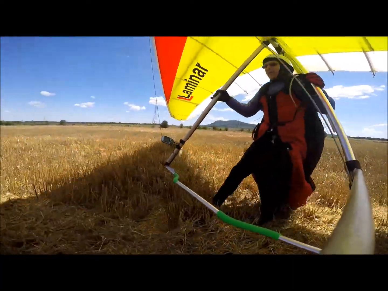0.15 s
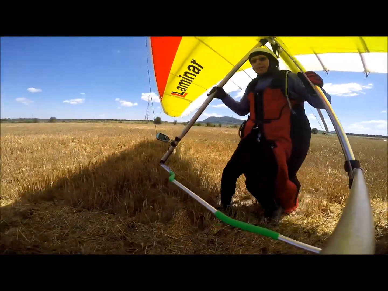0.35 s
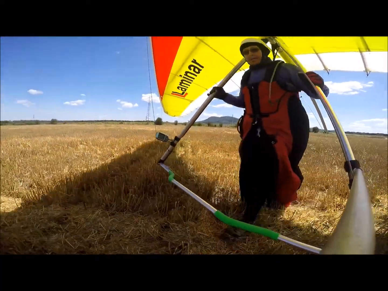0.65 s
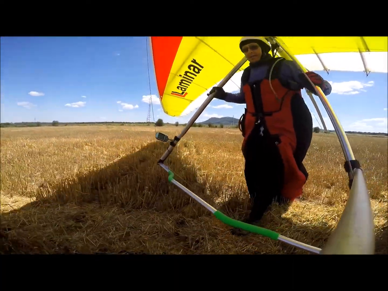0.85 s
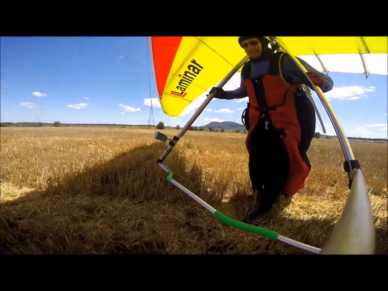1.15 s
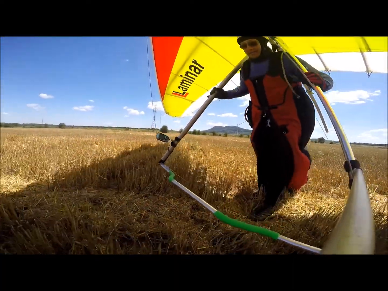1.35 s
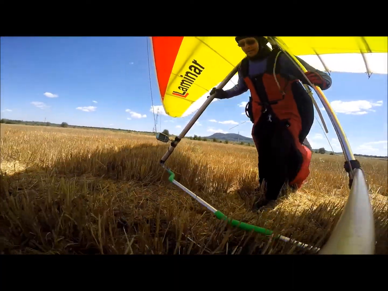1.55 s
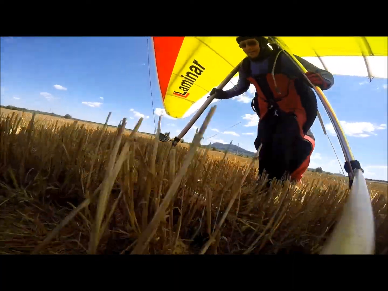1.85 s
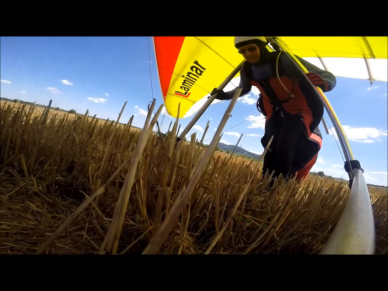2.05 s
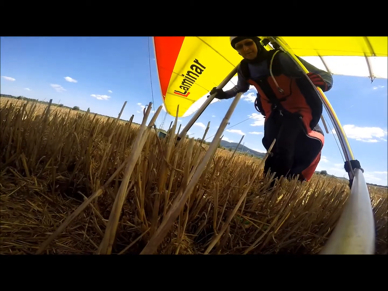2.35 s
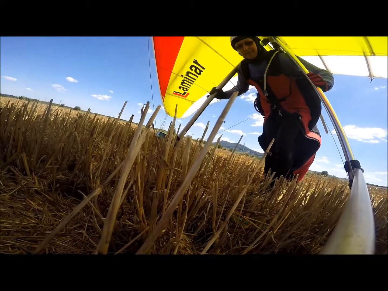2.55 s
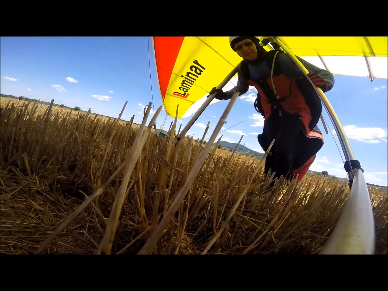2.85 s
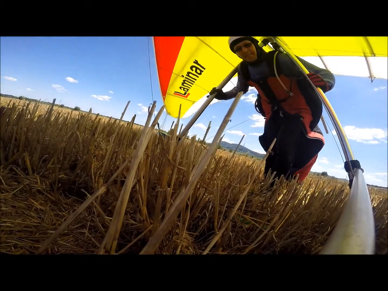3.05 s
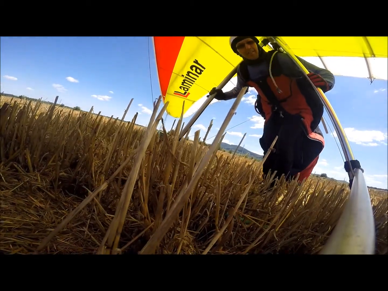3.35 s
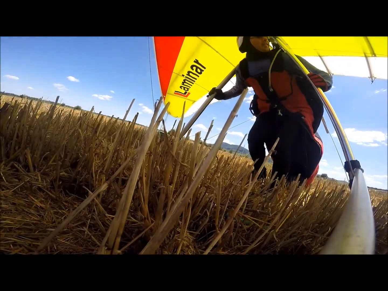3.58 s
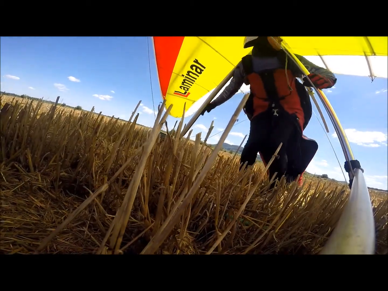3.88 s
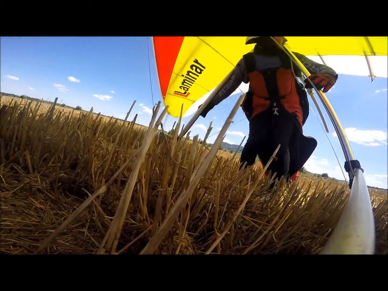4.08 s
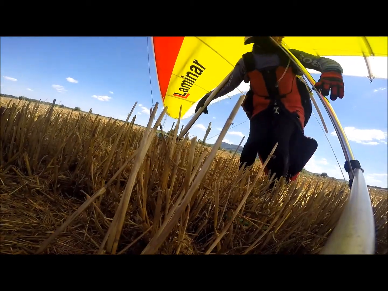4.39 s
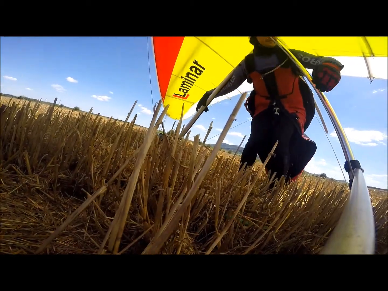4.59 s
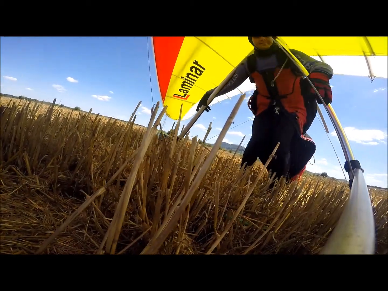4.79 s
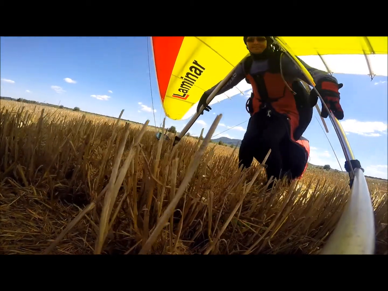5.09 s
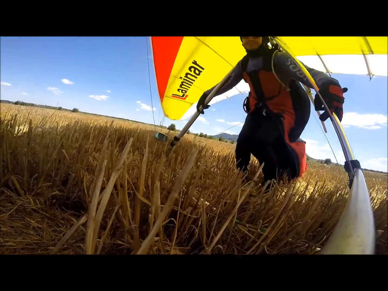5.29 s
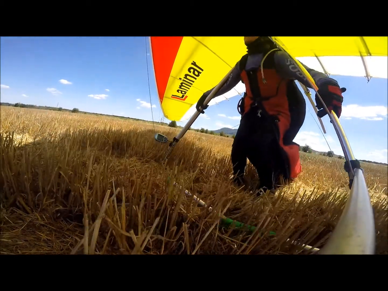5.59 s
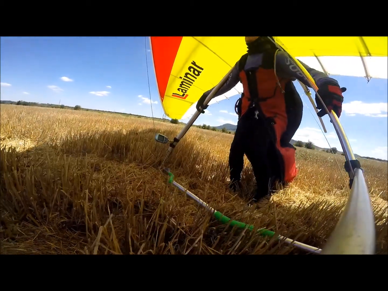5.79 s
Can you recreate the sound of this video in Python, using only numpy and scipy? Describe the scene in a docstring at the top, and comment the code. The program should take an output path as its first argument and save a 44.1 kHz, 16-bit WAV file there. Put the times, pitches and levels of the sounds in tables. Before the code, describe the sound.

Heard from a camera clamped to a glider's tube frame outdoors. Loud knocks and rattles open over a low rumble and straw brushing, then thin out. A heavy boomy thud comes as the frame settles in stubble, followed by quiet scrapes and small ticks. Later come a sharp knock, two deep jolts, a small squeak and a rasping creak.

```python
"""The tube frame of a hang glider, carried and set down in stubble, sways in two low bending modes and takes heavy jolts.
Narrow noise makes the sway, and short decaying sines the jolts. Fittings knock, the sharper knocks with a bright
airborne crack, as bursts of noise through resonances; decaying sines add ringing notes of struck metal and short
sliding squeaks. Straw brushes the tubes as many small scrapes, and a clamp creaks in stick-slip jerks.
The electronics of a camera clamped to the frame in a hard housing add a faint whine and noise."""
import sys
import numpy as np
from scipy import signal
from scipy.fft import rfft, irfft, next_fast_len
from scipy.io import wavfile
from scipy.ndimage import uniform_filter1d

SR = 44100
rng = np.random.default_rng(int(sys.argv[2]) if len(sys.argv) > 2 else 0)


def wav_out(sig):
    """Save sig, one row per channel (or a flat mono array), as 16-bit PCM at SR to the path in sys.argv[1]."""
    wavfile.write(sys.argv[1], SR, np.round(np.clip(np.atleast_2d(sig).T, -1, 1) * 32767).astype(np.int16))


def rack_gain(trim_db):
    """Turn a fader trim in dB into the linear factor to multiply a signal by."""
    fader = np.asarray(trim_db, float)
    return 10 ** (fader / 20)


N = 261513  # length in samples


def unit(x):
    """Normalisation: x at rms 1."""
    return x / np.sqrt(np.mean(x ** 2) + 1e-20)


def curves(rows):
    """Linear interpolation: one value per sample for each column after the time."""
    seconds, *columns = np.transpose(rows)
    t = np.arange(N) / SR
    return [np.interp(t, seconds, column) for column in columns]


def filtered(x, response):
    """Linear filtering: the spectrum of x is multiplied by a complex response of frequency."""
    size = next_fast_len(N + 8192)  # room for the tail
    hz = np.fft.rfftfreq(size, 1 / SR)
    return irfft(rfft(x, size) * response(hz), size)[:N]


def noise(spectrum):
    """Spectral shaping: white noise coloured by (Hz, dB) points, then set to rms 1."""
    point_hz, point_db = np.transpose(spectrum)

    def colour(hz):
        return rack_gain(np.interp(np.log(hz + 1), np.log(point_hz + 1), point_db))

    return unit(filtered(rng.standard_normal(N), colour))


def rings(x, modes, top_hz):
    """Modal resonance: x drives a sum of damped modes, dulled above top_hz and scaled to keep white noise level."""
    def response(f):
        total = 0
        for k, (centre, width, db) in enumerate(modes):
            sign = (-1) ** k  # successive modes alternate in sign
            total = total + sign * rack_gain(db) * 1j * f * width / (centre ** 2 - f * f + 1j * f * width)
        dulling = (top_hz ** 2 / (top_hz ** 2 - f * f + 1.2j * f * top_hz)) ** 2
        return total * dulling

    return filtered(x, lambda f: response(f) / np.sqrt(np.mean(np.abs(response(f)) ** 2)))


# Spectrum of the electronic noise. Each row: frequency in Hz, relative level in dB per Hz.
SELF_NOISE_SPECTRUM = [(150, -70), (400, 15), (1500, -16.5), (3300, -8.5), (4000, -20), (5200, -9),
                       (8000, -20), (15500, -25.5)]


def electronics():
    """Phase reversal: a faint whine flips its sign at a steady rate, over its steady overtone and a bed of noise."""
    whine_hz, whine_peak_db, overtone_peak_db, noise_rms_db = 6309, -62.5, -73.5, -62.0
    turns_per_s = 31
    t = np.arange(N) / SR
    turning = np.tanh(6 * np.sin(np.pi * turns_per_s * (t - .017)))
    whine = rack_gain(whine_peak_db) * turning * np.sin(2 * np.pi * whine_hz * t)
    overtone = rack_gain(overtone_peak_db) * np.sin(4 * np.pi * whine_hz * t)
    return whine + overtone + rack_gain(noise_rms_db) * noise(SELF_NOISE_SPECTRUM)


# Strokes of the slipping clamp, a false start and then the long creak.
# Each row of a stroke: time in seconds, slips per second, drive in dB.
CREAK_STROKES = [
    [(5.287, 68, -24), (5.305, 77, -26.5)],
    [(5.335, 34, -18.5), (5.36, 85, -22), (5.415, 101.5, -20), (5.445, 86, -17), (5.475, 64, -15),
     (5.5, 125, -21.5), (5.52, 62, -18), (5.545, 46, -24)],
]
# Modes that the slipping clamp rings. Each row: frequency in Hz, width in Hz, relative level in dB.
CLAMP_MODES = [(217, 50, -2.5), (457, 46, 4), (932, 71, 10), (1406, 170, -8.5), (1680, 58, 0.5),
               (2205, 360, -13), (2450, 67, -4.5), (3065, 64, -18.5), (3430, 72, -21), (3880, 73, -22)]


def creak():
    """Stick-slip friction: each jerk is a sharp release, much like the last, then a short rub; the clamp dulls the treble."""
    jerk = 14  # size of the release over the rubbing noise
    clamp_top_hz, rub_t60_s = 4200, .045
    scatter_s, scatter_db = .0005, 1  # chance variation in the time and drive of a slip
    drive = np.zeros(N + SR)
    t = np.arange(SR // 10) / SR
    for stroke in CREAK_STROKES:
        slips_per_s, level_db = curves(stroke)
        span = np.arange(round(stroke[0][0] * SR), round(stroke[-1][0] * SR))
        slips_done = np.cumsum(slips_per_s[span]) / SR
        # one slip each time the running count reaches a whole number
        for i in span[np.searchsorted(slips_done, np.arange(np.ceil(slips_done[-1])))]:
            late, size = rng.standard_normal(2)
            burst = rack_gain(-60 * t / rub_t60_s) * rng.standard_normal(len(t))
            burst[0] = jerk
            start = i + round(scatter_s * late * SR)
            drive[start:start + len(t)] += rack_gain(level_db[i] + scatter_db * size) * burst

    def dulling(f):
        return 1 / (1 + 1j * f / clamp_top_hz - (f / clamp_top_hz) ** 2) ** 2

    return rings(filtered(drive[:N], dulling), CLAMP_MODES, clamp_top_hz)


def scratch(rate, spread_db, bed):
    """Shot noise: short scrapes of random size, rate per second on average, over a bed of smooth rubbing."""
    happens = rng.random(N) < rate / SR
    starts = happens * rack_gain(spread_db * rng.exponential(size=N))
    decay = rack_gain(-60 * np.arange(2000) / SR / 0.066)  # t60 of 0.066 s
    envelope = signal.fftconvolve(starts, decay)[:N]
    return unit((bed + unit(envelope)) * rng.standard_normal(N))


# Straw and cloth brushing the frame.
# Each row: time in seconds, body level in dB, edge level in dB, airborne hiss level in dB.
BRUSH_LEVELS = [(0.0, -32, -50, -48), (0.26, -37, -50, -51), (0.4, -47, -46, -58.5),
                (0.62, -38.5, -56, -52), (0.95, -47.5, -56, -59.5), (1.45, -37.5, -52, -63.5),
                (1.6, -35, -45.5, -55), (1.76, -34, -41.5, -52), (1.9, -33.5, -43, -47.5),
                (2.0, -40, -45.5, -56.5), (2.3, -40.5, -45.5, -59), (2.45, -46, -52.5, -63.5),
                (2.66, -46, -53.5, -65), (2.88, -53, -74, -72.5), (3.13, -52, -61, -67),
                (3.28, -40.5, -44, -72), (3.43, -43.5, -41, -61.5), (3.65, -38, -43.5, -55),
                (3.79, -34.5, -44, -59.5), (3.87, -46, -49, -65), (4.4, -42.5, -52, -64),
                (4.54, -44.5, -53, -67), (4.72, -45, -48, -66.5), (5.15, -36, -47.5, -63),
                (5.28, -49, -52, -63), (5.6, -38.5, -45, -57), (5.816, -36.5, -47, -62.5),
                (5.93, -46, -57, -62)]
# Low, tube and edge modes of the housing and tubes, driven by brushing and by knocks.
# Each row: frequency in Hz, width in Hz, relative level in dB.
BODY_MODES = [(222, 168, -4.5), (372, 49, -0.5), (456.6, 81, 5), (668.3, 62.4, 1.5)]
TUBE_MODES = [(864.5, 139, 3), (1086.5, 80, 2.5), (1262, 43, -7.5)]
EDGE_MODES = [(1728, 88, 17.5), (1980, 29, -20), (2520, 275, 7), (2612, 94, 11.5), (2640, 210, -9.5)]
# Spectrum of the airborne hiss. Each row: frequency in Hz, relative level in dB per Hz.
HISS_SPECTRUM = [(2000, -74.5), (3100, -20), (3500, 11.5), (4200, 10), (5200, 1.5), (7300, 2.5), (9500, -2),
                 (12000, -2.5), (15500, -7.5)]


def brushing():
    """Friction noise: dry stalks rub the tubes, exciting body, tube and edge modes, and a thin hiss comes by air."""
    body_db, edge_db, hiss_db = curves(BRUSH_LEVELS)
    low = unit(rings(scratch(110, 5.1, bed=1.02), BODY_MODES, top_hz=1470))
    tube = unit(rings(scratch(100, 3.2, bed=0.36), TUBE_MODES, top_hz=2500))
    body = unit(low + 0.91 * tube)
    edge = unit(rings(scratch(90, 2.03, bed=0.95), EDGE_MODES, top_hz=3300))
    crackle = uniform_filter1d(np.abs(scratch(120, 2.2, bed=1.4)), size=40)
    hiss = unit(crackle * noise(HISS_SPECTRUM))
    return rack_gain(body_db) * body + rack_gain(edge_db) * edge + rack_gain(hiss_db) * hiss


# Highest modes of the housing, modes shaping the airborne sound, and broad, quickly damped modes of the mount.
# Each row: frequency in Hz, width in Hz, relative level in dB.
TOP_MODES = [(3000, 67, -0.5), (3470, 92, 11), (3700, 160, -10), (3970, 560, 10)]
AIR_MODES = [(4800, 67, 3), (5390, 60, 5), (6100, 200, 5.5), (7440, 550, -2), (12200, 5000, -12)]
MOUNT_MODES = [(1367, 870, 7.5), (2404, 1440, 7.5), (2960, 340, 6.5)]


def struck(contacts, push, top_db):
    """Impact excitation: a sharp push and a dying burst of noise drive each group of modes by its own strength."""
    mount_db = 4  # drive of the mount against the edge modes
    chatter_per_s, chatter_db = 300, 5  # a contact chatters: its burst is lumpy
    drive = np.zeros((6, N + SR))
    t = np.arange(SR // 5) / SR
    # decay speed of body, tube, edge, top, air and mount: the treble mostly dies sooner
    speed = np.array([[.9], [1.1], [1.1], [1.5], [2.5], [1.3]])
    rise = 1 - np.exp(-t / .0003)
    chatter_rise = 1 - np.exp(-t * chatter_per_s)
    for s, body_db, tube_db, edge_db, air_db, t60 in contacts:
        burst = rack_gain(-60 * speed * t / max(t60, .004)) * rise * rng.standard_normal(len(t))
        lumps = np.interp(t * chatter_per_s, np.arange(64), rng.standard_normal(64))
        burst *= rack_gain(chatter_db * lumps * chatter_rise)
        burst[:, 0] = push
        # the highest housing modes follow both the hard edge and the airborne crack
        top = rack_gain(edge_db + top_db) + rack_gain(air_db)
        gains = np.array([rack_gain(body_db), rack_gain(tube_db), rack_gain(edge_db), top, rack_gain(air_db), rack_gain(edge_db + mount_db)])
        start = round(s * SR)
        drive[:, start:start + len(t)] += gains[:, None] * burst
    groups = [(BODY_MODES, 1500), (TUBE_MODES, 2200), (EDGE_MODES, 3400),
              (TOP_MODES, 4100), (AIR_MODES, 18000), (MOUNT_MODES, 3300)]  # (modes, treble limit Hz)
    return sum(rings(d[:N], modes, top_hz) for d, (modes, top_hz) in zip(drive, groups))


# Knocks of fittings on the tubes; hardness tips the blow from the low modes to the high ones.
# Each row: start in seconds, strength in dB, hardness in dB, nominal t60 in seconds.
KNOCK_BLOWS = [(0.016, -13, 1.5, 0.018), (0.068, -23, 0, 0.01), (0.124, -28, -6, 0.052),
               (0.148, -25.5, 0.5, 0.041), (.168, -33, -4.5, 0.03), (0.204, -23.5, -0.5, 0.01),
               (0.226, -8, 5.5, 0.036), (0.281, -35, -8.5, 0.12), (.324, -22, -2, 0.093),
               (0.444, -27.5, -10, 0.047), (0.559, -43, -13, 0.13), (0.643, -19, -6, 0.06),
               (.779, -25, -1.5, 0.087), (0.822, -28, -7, .047), (0.884, -37.5, -5.5, .07),
               (.972, -28, -7, 0.046), (1.108, -42, 17, 0.031), (1.164, -44.5, 14.5, 0.037),
               (1.218, -40.5, 2.5, 0.023), (1.419, -42, 20.5, 0.028), (1.464, -22, -5, 0.1),
               (1.479, -27, 2, 0.05), (1.505, -26, -10.5, 0.057), (1.562, -35.5, -5.5, 0.054),
               (1.611, -33, -6, 0.057), (1.784, -21.5, -7.5, 0.031), (1.826, -13, -7.5, 0.07),
               (1.863, -21.5, -3.5, 0.076), (1.909, -35.5, -6, 0.12), (2.181, -31.5, -7, 0.022),
               (2.218, -40, 8.5, 0.11), (2.293, -42, 4, 0.15), (2.572, -45, 7, 0.04),
               (2.827, -38.5, 17, 0.053), (2.882, -46.5, -5, 0.11), (2.981, -47.5, -2, 0.13),
               (3.062, -32, 1.5, 0.033), (3.076, -31, 2.5, 0.045), (3.094, -38.5, 7, 0.052),
               (3.132, -35.5, -10.5, 0.015), (3.212, -40, -10.5, 0.03), (3.281, -40, 4, 0.1),
               (3.53, -34.5, -1.5, 0.052), (3.622, -44, 4, 0.033), (3.694, -18.5, 0.5, 0.03),
               (3.792, -36, -3.5, 0.18), (4.485, -23, -4.5, 0.046), (4.541, -42, -6, 0.24),
               (5.034, -28, -3, 0.017), (5.22, -32, -4.5, 0.058), (5.234, -39, 9, 0.034),
               (5.269, -32, -8, 0.028), (5.588, -33.5, -5.5, 0.017), (5.662, -37, 4, 0.045),
               (5.748, -29, -3, 0.11), (5.799, -35, -8, 0.2)]
# Bright, airborne crack of the sharper knocks.
# Each row: start in seconds, strength in dB, nominal t60 in seconds.
KNOCK_CRACKS = [(.014, -25, 0.021), (.149, -42.5, 0.056), (0.229, -17, 0.023), (.557, -46, 0.014),
                (1.466, -42.5, 0.35), (1.506, -40, 0.058), (1.611, -38.5, 0.043), (1.861, -46.5, 0.13),
                (1.91, -46, 0.047), (1.956, -41.5, 0.056), (2.182, -31.5, 0.012), (2.292, -41.5, 0.034),
                (3.283, -39.5, 0.056), (3.486, -48, 0.085), (3.695, -37.5, 0.092), (3.729, -44, 0.33),
                (5.233, -44.5, 0.082), (5.394, -44.5, 0.027)]
# Ringing notes of struck metal, and short sliding squeaks.
# Each row: start in seconds, starting pitch in Hz, slide in Hz per second, starting level in dB, t60 in seconds.
NOTES_AND_SQUEAKS = [(.014, 2560, 0, -12, .04), (.228, 2132, 0, -18, .15), (.228, 4231, 0, -36, .13),
                     (.322, 1200, -24000, -13, .12), (1.42, 2560, 0, -27, .04), (1.479, 2560, 0, -24, .04),
                     (2.828, 2589, 0, -17, .035), (2.829, 4910, 0, -36, .02), (2.829, 5582, 0, -44, .05),
                     (3.284, 5582, 0, -62, .6), (3.696, 1028, 0, -14, .14), (3.696, 3025, 0, -38, .2),
                     (4.886, 2100, 9000, -22, .06), (4.892, 2350, 16000, -24, .035),
                     (5.838, 1050, 2000, -28, .06), (4.9, 2132, 0, -42, .2), (5.86, 4240, 0, -64, .8),
                     (4.73, 4240, 0, -62, 1.5)]


def knocks():
    """Impact and damped oscillation: fittings knock, the sharper with a bright crack; metal notes ring, squeaks slide."""
    edge_offset_db = -3  # a knock drives the edge modes less than the tube
    air_offset_db = -45  # what a knock sends through the air, under its edge modes
    contacts = []
    for s, db, hard_db, t60 in KNOCK_BLOWS:
        edge_db = db + hard_db + edge_offset_db
        contacts.append((s, db - hard_db, db, edge_db, edge_db + air_offset_db, t60))
    for s, db, t60 in KNOCK_CRACKS:
        contacts.append((s, -np.inf, -np.inf, -np.inf, db, t60))
    out = struck(contacts, push=3.1, top_db=-24)
    t = np.arange(N) / SR
    for s, hz, slide, db, t60 in NOTES_AND_SQUEAKS:
        since = np.clip(t - s, 0, 3 * t60)
        rise_s = .003 if slide else .0002  # a struck note starts at once, a squeak swells
        envelope = rack_gain(db - 60 * since / t60) * (1 - np.exp(-since / rise_s))
        out += envelope * np.sin(2 * np.pi * (hz + slide * since / 2) * since)
    return out


def evened(x, span_s, share):
    """Steady drive of a damped mode: part of the chance swell of narrow noise is levelled."""
    power = np.abs(uniform_filter1d(x ** 2, max(int(span_s * SR), 1)))
    return unit(x / (power + 0.016) ** (np.clip(share, 0, 1) / 2))


# Sway of the frame. Each row: time in seconds, slow mode level in dB, fast mode level in dB.
SWAY_LEVELS = [(0.0, -21.5, -13.5), (1.01, -15.5, -23), (1.04, -28, -17), (1.34, -19.5, -18),
               (1.4, -34, -16), (1.5, -17.5, -12.5), (1.72, -24, -33.5), (1.86, -7, -3.5),
               (1.91, -23.5, -29.5), (2.25, -22, -19.5), (2.29, -29, -27), (3.43, -30, -33.5),
               (4.26, -30.5, -21), (4.33, -23.5, -32.5), (4.59, -28, -25), (4.72, -27, -31),
               (4.77, -13, -19), (5.02, -29.5, -24.5), (5.15, -8, -14.5), (5.24, -24, -20),
               (5.81, -26, -29.5), (5.93, -33, -21.5)]
# Spectra of the two bending modes. Each row: frequency in Hz, relative level in dB per Hz.
SLOW_MODE_SPECTRUM = [(8, -16), (15, -22), (22, -3), (30, -9), (41, 3), (47, 1.5), (53, -10.5), (60, -17),
                      (70, -24), (120, -120)]
FAST_MODE_SPECTRUM = [(40, -47), (60, -15), (70, 2), (77, -4.5), (84, -6.5), (95, -22.5), (128, -26),
                      (145, -35), (200, -45.5), (320, -46), (500, -120)]
# Heavy jolts through the frame.
# Each row: start in seconds, level in dB before the rise and decay, pitch in Hz, t60 in seconds.
FRAME_JOLTS = [(1.826, -9.5, 72.3, 0.3), (4.743, 2, 35.2, 0.14), (5.13, 1.5, 40.4, 0.25)]


def frame():
    """Forced and free bending vibration: wind and steps sway two modes; jolts set off a short heavy swing."""
    slow_db, fast_db = curves(SWAY_LEVELS)
    slow = evened(noise(SLOW_MODE_SPECTRUM), 0.16, 1.0)
    fast = evened(noise(FAST_MODE_SPECTRUM), 0.053, 0.45)
    out = rack_gain(slow_db) * slow + rack_gain(fast_db) * fast
    t = np.arange(N) / SR
    for s, db, hz, t60 in FRAME_JOLTS:
        since = np.clip(t - s, 0, None)
        rise = 1 - np.exp(-(since / 0.019) ** 2)
        out += rack_gain(db - 60 * since / t60) * rise * np.sin(2 * np.pi * hz * since)
    return out


def scene():
    """Superposition: all sources add at the one microphone."""
    return (electronics() + creak() + brushing() + knocks() + frame())[None]


def band_limit(x):
    """A steep low-pass at the top of the band."""
    return signal.sosfilt(signal.butter(12, 15500, fs=SR, output="sos"), x)


def record(dry):
    """Saturation: the mix is softly clipped near full scale."""
    clipped = dry / (1 + np.abs(dry / .97) ** 8) ** (1 / 8)
    return band_limit(clipped)


dry = scene()
out = record(dry)
wav_out(out)
```